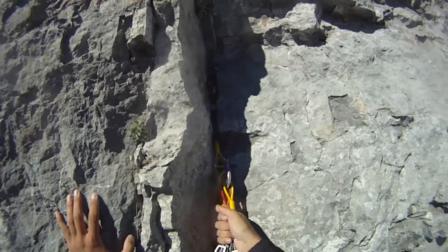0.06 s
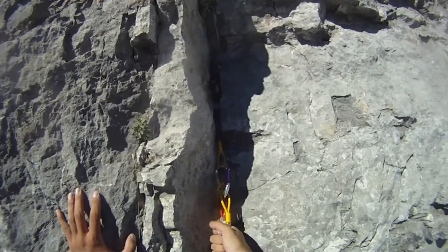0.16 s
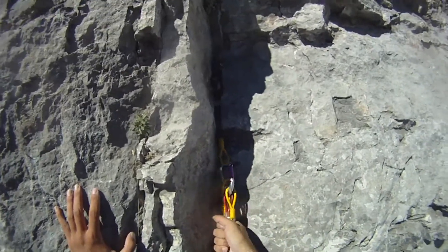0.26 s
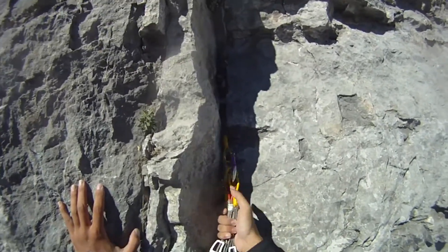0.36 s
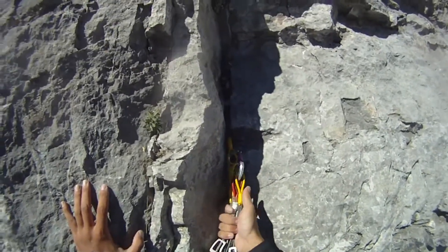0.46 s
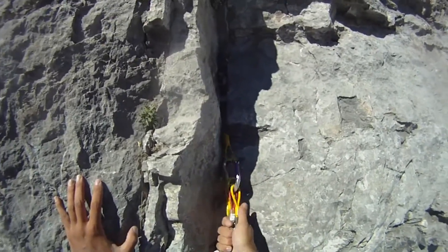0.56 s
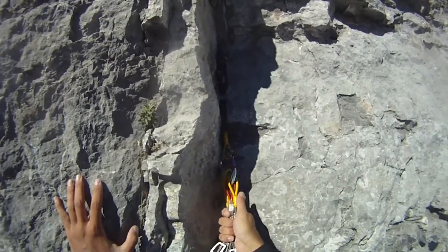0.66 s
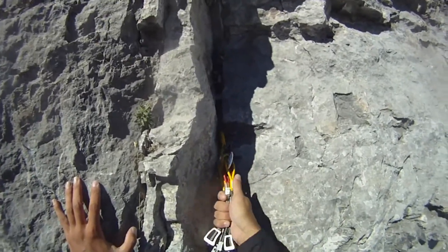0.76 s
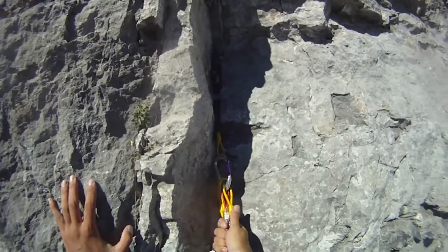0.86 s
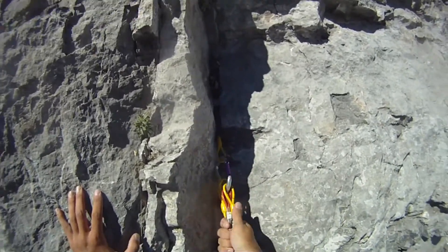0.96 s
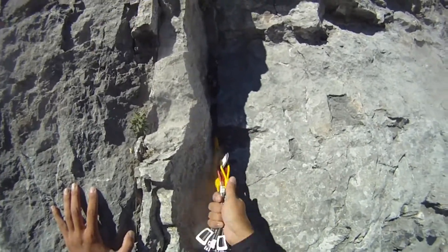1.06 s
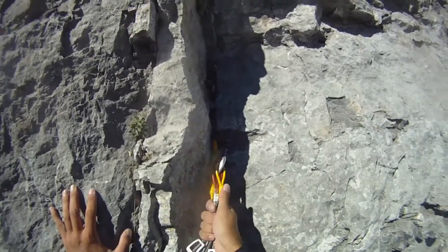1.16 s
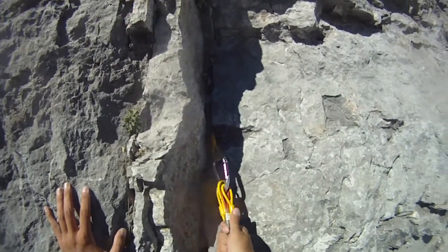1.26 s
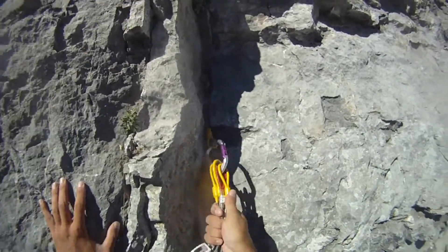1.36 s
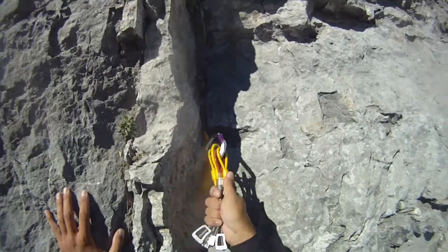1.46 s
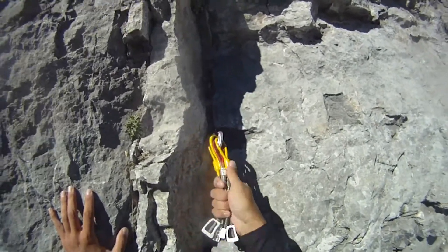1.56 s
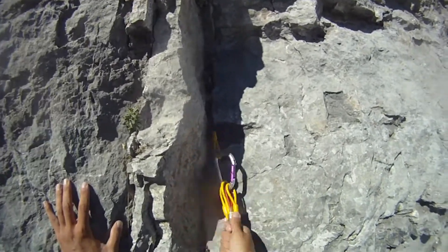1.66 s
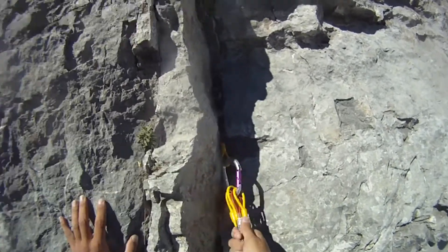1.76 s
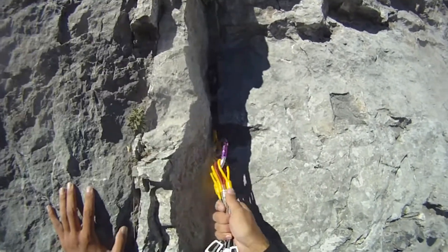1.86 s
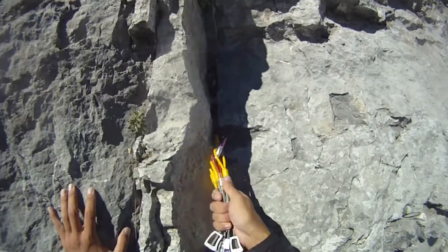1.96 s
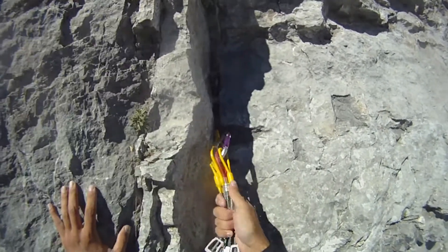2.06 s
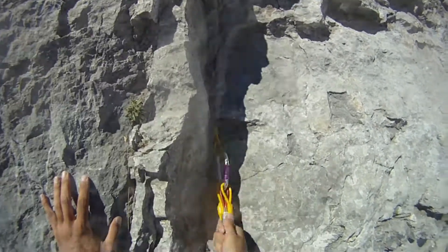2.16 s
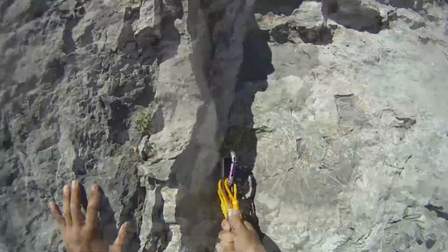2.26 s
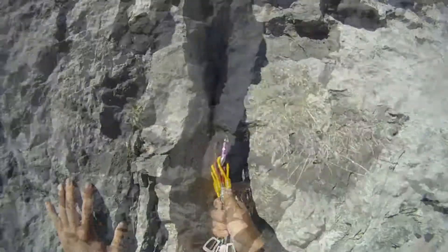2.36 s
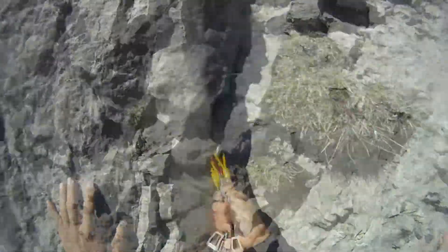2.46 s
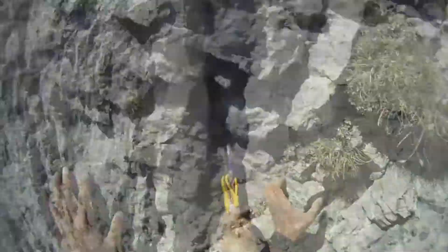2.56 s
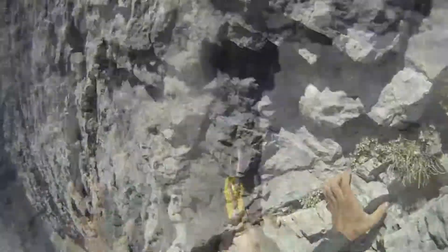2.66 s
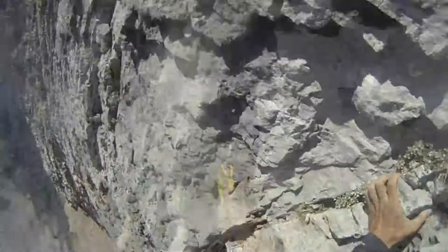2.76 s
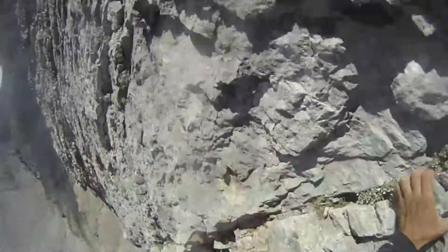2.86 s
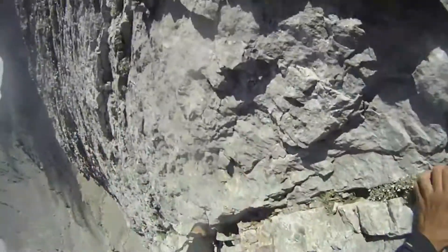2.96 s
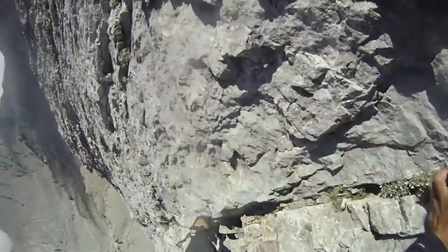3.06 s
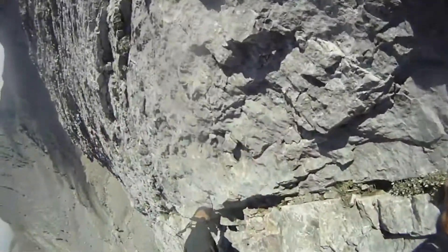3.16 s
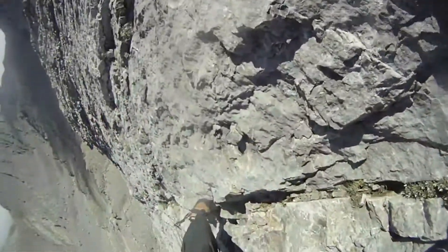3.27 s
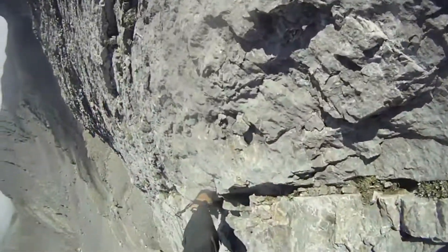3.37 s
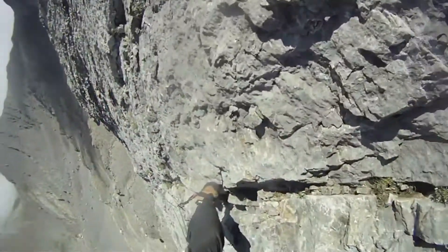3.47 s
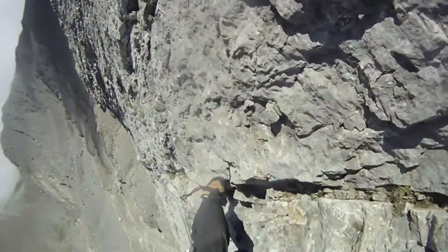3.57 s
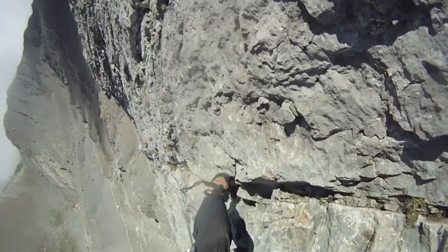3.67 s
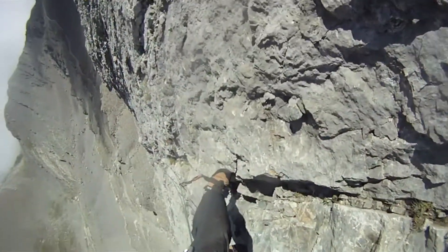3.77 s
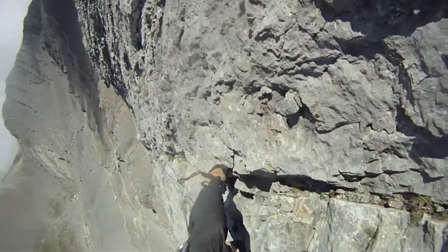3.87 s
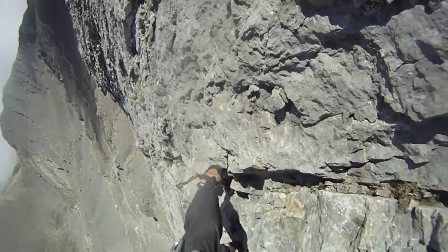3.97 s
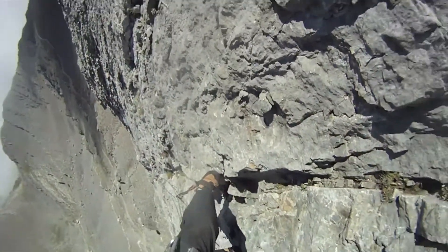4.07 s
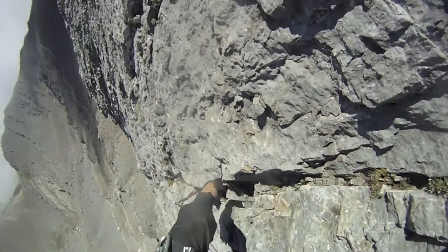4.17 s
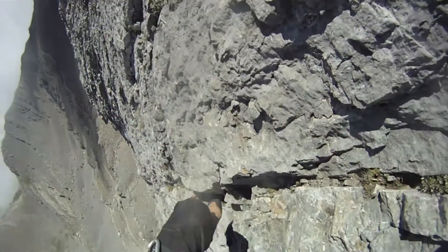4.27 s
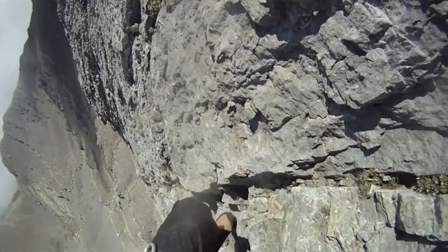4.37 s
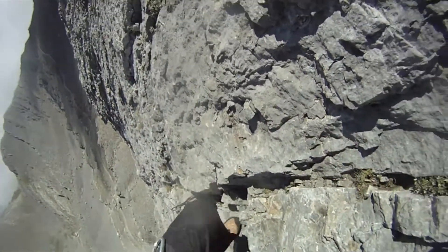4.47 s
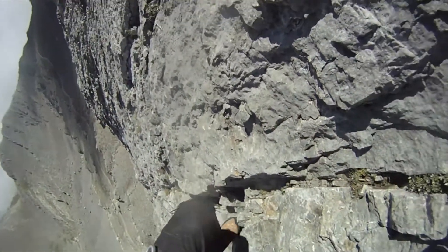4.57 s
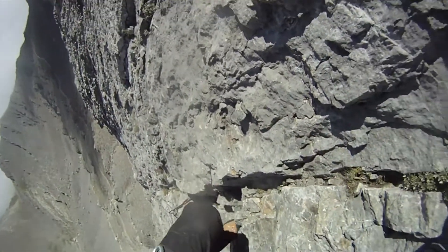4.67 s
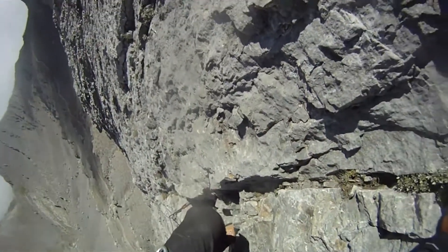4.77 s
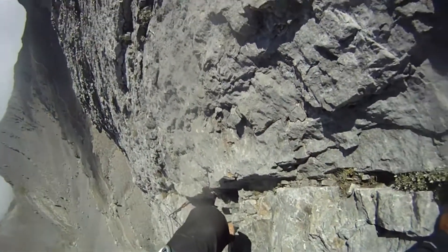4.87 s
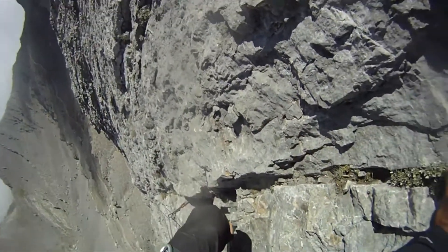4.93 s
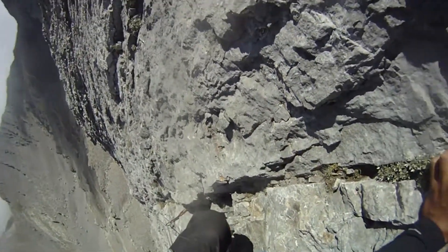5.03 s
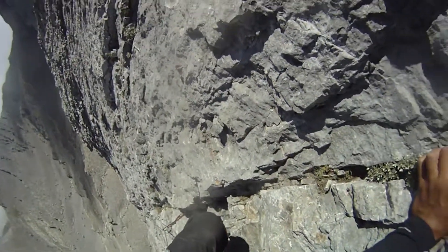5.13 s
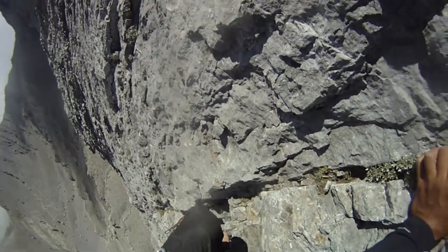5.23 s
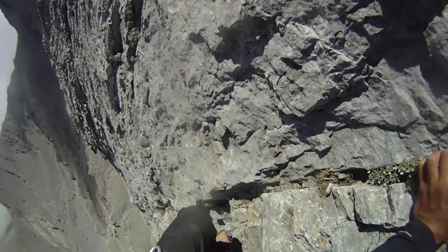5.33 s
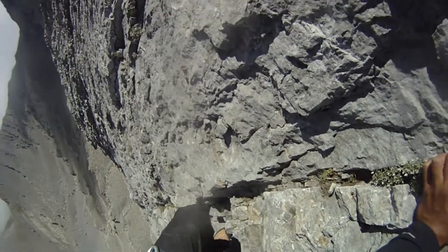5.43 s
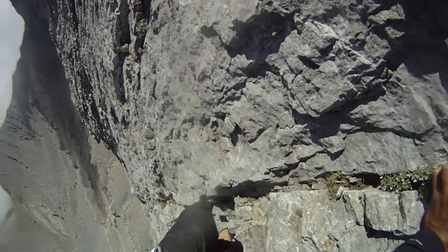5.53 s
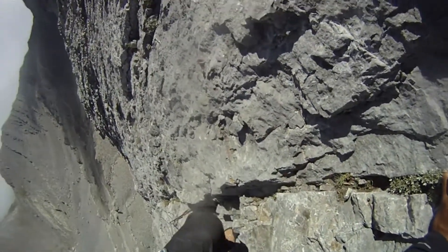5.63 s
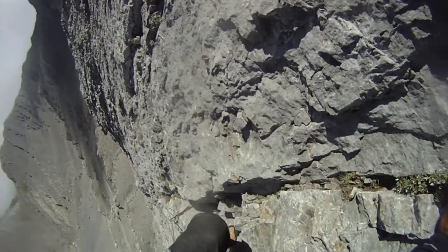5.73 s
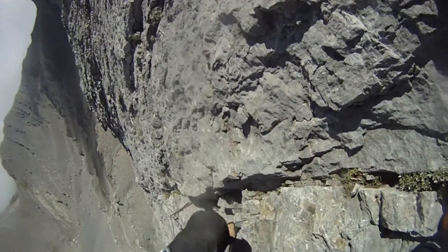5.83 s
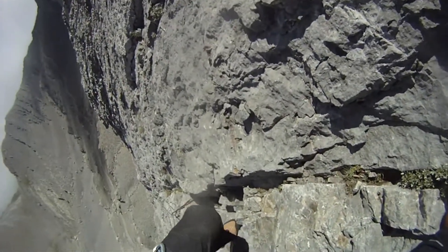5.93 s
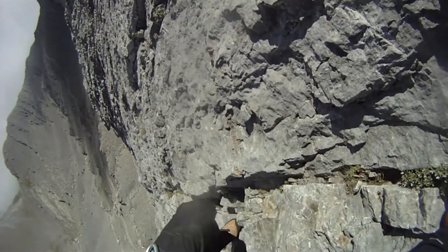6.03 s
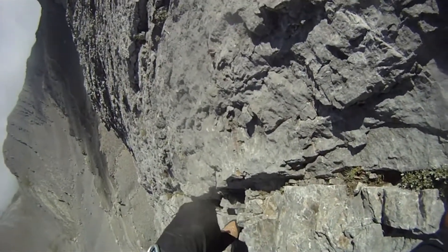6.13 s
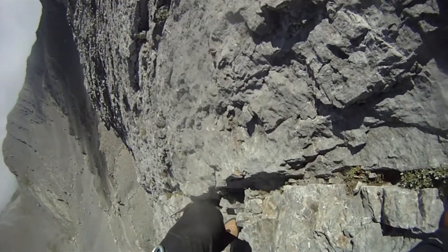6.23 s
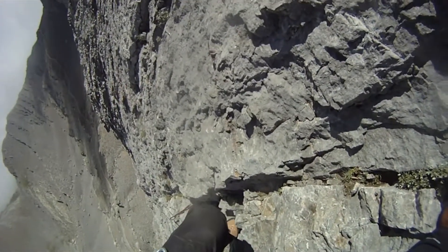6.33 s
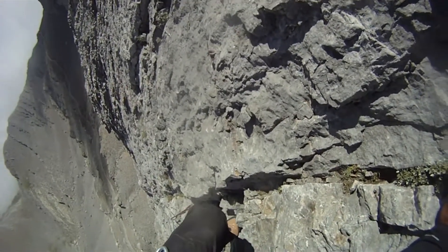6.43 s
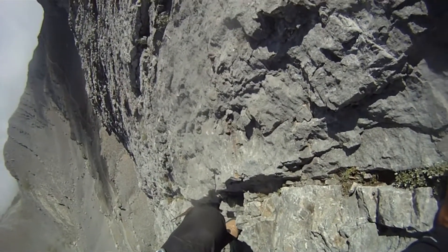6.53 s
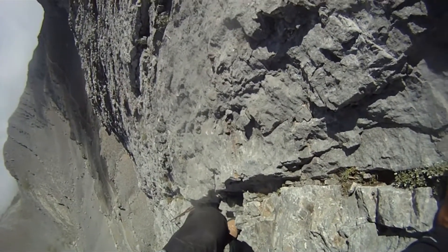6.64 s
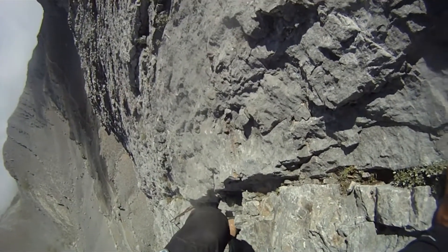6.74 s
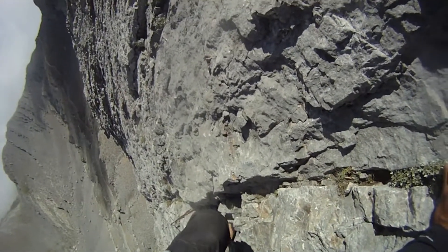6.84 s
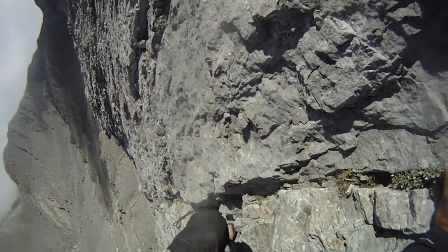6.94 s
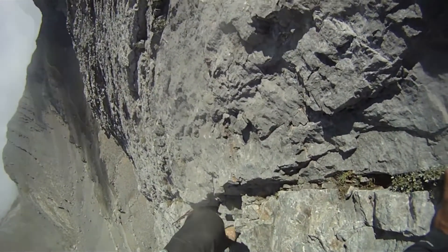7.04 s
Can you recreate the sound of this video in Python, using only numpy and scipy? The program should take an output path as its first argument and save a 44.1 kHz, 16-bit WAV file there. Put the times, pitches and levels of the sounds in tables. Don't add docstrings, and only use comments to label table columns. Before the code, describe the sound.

Metal climbing wedges are yanked in a rock crack, snapping and clinking over dull body thuds, then faint gear bumps and a carabiner chinks on a ledge.

```python
import sys
import numpy as np
from scipy import signal
from scipy.fft import rfft, irfft, next_fast_len
from scipy.io import wavfile
from scipy.ndimage import uniform_filter1d, minimum_filter1d

SR = 44100
rng = np.random.default_rng(int(sys.argv[2]) if len(sys.argv) > 2 else 0)


def invert_db(x):
    u = np.asarray(x, float) / 20
    return 10 ** u


def transcribe(u):
    v = np.clip(np.atleast_2d(u).T, -1, 1)
    q = np.round(v * 32767).astype(np.int16)
    wavfile.write(sys.argv[1], SR, q)


N = 313095

# pitch_hz, width_hz, level_db
KNOCK_MODES = [(1069, 99, 1), (1294, 170, 0)]
BODY_MODES = [(1635, 150, -4.5), (1980, 280, 4), (2430, 430, 3.5), (2647, 450, 1)]
EDGE_MODES = [(3104, 130, -4.5), (3490, 580, -3.5), (4050, 710, -2), (4490, 420, 0), (5210, 1850, -9)]
# start_s, end_s, level_db
SCRAPES = [(0.241, 0.401, -79), (0.606, .82, -78), (0.913, 1.038, -62), (1.281, 1.427, -68),
           (1.409, 1.522, -65.5), (1.715, 1.794, -64.5), (1.795, 1.963, -60.5), (2.231, 2.345, -66.5),
           (2.336, 2.43, -69), (2.614, 2.78, -90), (4.633, 4.81, -71.5)]
SLOW_HZ = 12000


def unit(x):
    return x / np.sqrt(np.mean(x ** 2))


def shape(x, gain):
    size = next_fast_len(N)
    hz = np.arange(size // 2 + 1) * SR / size
    return irfft(rfft(x, size) * gain(hz), size)[..., :N]


def coloured(points):
    hz, db = np.transpose(points)
    return unit(shape(rng.standard_normal(N), lambda f: invert_db(np.interp(np.log(f + 1), np.log(hz), db))))


def resonate(x, modes):
    out = 0
    for k, (hz, width_hz, db) in enumerate(modes):
        out = out + (-1) ** k * invert_db(db) * signal.lfilter(*signal.iirpeak(hz, hz / width_hz, SR), x)
    return out


def walk(rate_hz):
    hold = int(SR / rate_hz)
    return uniform_filter1d(np.repeat(rng.standard_normal(N // hold + 1), hold), hold)[:N]


def add(out, s, x):
    i = int(s * SR)
    out[i:i + len(x)] += x[:len(out) - i]


def effort():
    # start_s, end_s, level_db
    tugs = [(0., 0.04, -42), (0.59, 0.668, -42.5), (0.954, 1., -30), (1.302, 1.446, -24.5),
            (1.765, 1.935, -23.5), (2.246, 2.385, -30.5), (2.63, 2.75, -40.5), (3.155, 3.263, -51.5),
            (3.55, 4.1, -51), (4.2, 4.953, -52.5), (5.595, 5.646, -55), (6.15, 6.22, -52.5),
            (6.654, 6.724, -52), (6.9, 6.936, -50)]
    rise_db_per_s, fall_db_per_s = 300, 250
    t = np.arange(N) / SR
    pulls = [db - rise_db_per_s * np.maximum(start - t, 0) - fall_db_per_s * np.maximum(t - end, 0)
             for start, end, db in tugs]
    rest_db = -61 + 4 * walk(7)
    return np.maximum(np.max(pulls, axis=0), rest_db)


def rattles(tap_hz):
    rows, gap_s = [], 0.022
    for start, end, _ in SCRAPES[:-1]:
        gap, size, knock, edge, pitch = rng.standard_normal((10, 5)).T
        times = start - 0.025 + np.cumsum(gap_s * np.exp(0.5 * gap)) - gap_s
        for s, u, k, e, p in zip(times, size, knock, edge, pitch):
            if s < end - 0.015:
                rows.append((s, -64 + u, -3 + 3.36 * k, -15 + 7.5 * e, 0.0015, tap_hz * np.exp(0.11 * p)))
    return rows


def contacts(effort_db):
    # start_s, level_db, hollow_knock_rel_db, bright_edge_rel_db
    taps = [(0.2337, -58, -15, -16), (.248, -57, -8, 6), (.2573, -46, -19, 0), (0.2928, -46.5, -15, -1),
            (0.3272, -45, -7, 0), (0.3831, -48, -22, -2), (0.6045, -39.5, -27, 3), (0.661, -47.5, -23, -4),
            (0.667, -54, -19, -2), (0.735, -52, -17, -8), (0.815, -52, -15, 1), (.9257, -43, -24, -5),
            (0.9465, -36, -5.5, -1), (.9966, -47.5, -10, -5), (1.021, -54, -9, 1), (1.2796, -33.5, -6, 5.5),
            (1.2861, -39.5, -3, 0), (1.3474, -31, 1, -3.5), (1.3985, -51, -1, -12), (1.728, -43, -7, -4.5),
            (1.738, -45, -21, 0), (1.8054, -60, -1, -11), (1.8154, -35, -3.5, 9), (1.8318, -48.5, 1.5, -4),
            (1.878, -33, -7, 4.5), (2.0544, -50.5, -2, -6), (2.3164, -53, -1, -12), (2.3516, -41.5, -20, 5),
            (2.7595, -58, -16, 5)]
    # start_s, level_db, bright_edge_rel_db, wedge_pitch_hz
    clinks = [(0.647, -41, 0, 4050), (0.7484, -43.5, 0.5, 4100), (.81, -51, -14, 3030),
              (0.9597, -36.5, -4, 4070), (1.034, -45.5, 3, 3680), (1.0396, -38.5, 1.5, 3960),
              (1.2945, -35, 12, 4460), (1.324, -34.5, 4.5, 4200), (1.338, -33, 6, 3600),
              (2.2002, -50.5, 3, 3620), (2.261, -46, 10, 3700), (2.276, -54, -1, 3830),
              (2.2987, -47, 17, 3730), (2.621, -53, 2, 4050), (2.703, -54, 6, 3880),
              (2.7508, -49.5, 5, 3700), (2.754, -52, -4, 3650)]
    # start_s, level_db, bright_edge_rel_db, wedge_pitch_hz
    skids = [(0.3195, -38, 5.5, 2430), (0.377, -51, 5, 2530), (0.6164, -50, 11, 3700),
             (1.3418, -34, 11, 2390), (1.3765, -36, 3, 4100), (1.433, -51, -3, 2350),
             (1.4438, -34, 12, 2330), (1.4508, -38.5, 4.5, 2390), (1.8647, -51, -9, 3830),
             (2.208, -52, 7, 3980), (2.2926, -41, 5, 2600), (2.357, -40.5, 2, 2470), (2.5528, -43, 2, 2420),
             (2.6918, -44.5, 4, 3580)]
    # start_s, level_db, bright_edge_rel_db, piece_pitch_hz
    bumps = [(3.2314, -60.5, -13, 2130), (3.894, -51.5, 11, 3860), (3.9015, -54.5, 6, 3840),
             (4.127, -57, -9, 1870), (4.4481, -65, -1, 3770), (4.4776, -60, 6, 3800),
             (4.552, -52.5, -15, 1920), (4.5963, -53, 17, 4600), (4.6577, -54.5, 13, 3700),
             (4.68, -55, 12, 3770), (4.7273, -41, 19, 4700), (4.7563, -55, 8, 3770),
             (4.7717, -53.5, 6, 4550), (4.9468, -59.5, 6, 3670), (5.4476, -61, 3, 3790),
             (6.4481, -67, 5, 3290), (6.9274, -60, -20, 1980)]
    tap_hz = 2180

    def seated_db(s):
        return -8 + 0.42 * (effort_db[int(s * SR)] + 27)

    rows = [(s, db, knock, edge, 0.0012, tap_hz) for s, db, knock, edge in taps]
    rows += [(s, db, seated_db(s), edge, 0.0008, hz) for s, db, edge, hz in clinks]
    rows += [(s, db, seated_db(s), edge, 0.0034, hz) for s, db, edge, hz in skids]
    rows += [(s, db, -4.5 + 0.14 * edge, edge, 0.0013, hz) for s, db, edge, hz in bumps]
    return rows + rattles(tap_hz)


def ticks(hits, span=2000):
    out, t = np.zeros(N), np.arange(span) / SR
    for s, db, knock_db, edge_db, chatter_s, hit_hz in hits:
        fade = np.exp(-np.maximum(t - chatter_s, 0) / 0.0032)
        fade += 0.039 * np.exp(-t / 0.0028) + 0.4 * np.exp(-t / 0.00056)
        chatter = rng.standard_normal(span) * fade * np.minimum(t / 0.00029, 1)
        chatter[8] += 5.0
        parts = []
        for modes in (KNOCK_MODES, BODY_MODES, EDGE_MODES):
            varied = [(hz, width, g + 1.5 * rng.standard_normal()) for hz, width, g in modes]
            parts.append(unit(resonate(chatter, varied)))
        knock, body, edge = parts
        crack = unit(resonate(rng.standard_normal(span) * fade, [(3100, 2600, 0)]))
        bunch = body + invert_db(edge_db) * edge + invert_db(min(edge_db, 0) - 3.5) * crack
        wedge = unit(resonate(chatter, [(hit_hz, 320, 0)]))
        bright = bunch + invert_db(max(edge_db, 0) - 4.5) * wedge
        peak = uniform_filter1d(bright ** 2, size=70).max()
        add(out, s - 0.0003, invert_db(db + 0.95) * (invert_db(knock_db) * knock + bright) / np.sqrt(peak))
    return out


def grit():
    t, ease_s = np.arange(N) / SR, 0.012
    drag = 0
    for start, end, db in SCRAPES:
        drag = drag + invert_db(db) * np.clip(np.minimum(t - start, end - t) / ease_s + 0.5, 0, 1)
    grains = rng.standard_normal(N) * invert_db(3.0 * walk(150))
    modes = [*KNOCK_MODES, *BODY_MODES, *EDGE_MODES[:3], (2330, 5900, -10.0)]
    return drag * unit(resonate(grains, modes))


def chinks():
    # start_s, peak_db, t60_s, free_s until it is touched
    strikes = [
        (4.449, -67, 0.056, .02),
        (4.479, -62.5, 0.34, 0.078),
        (4.658, -55, 0.2, .062),
        (4.728, -52, 0.039, .02),
        (4.758, -53, 0.07, 0.034),
        (4.812, -60, 0.043, .015),
        (1.768, -59.5, 0.043, .02),
    ]
    # pitch_hz, level_db, t60_factor
    modes = [(3757, 7, 0.93), (3800, -10, 0.54), (4070, -11.5, 4.6), (3130, -28, 1.2), (4600, -7, .4)]
    out, t = np.zeros(N), np.arange(SR // 8) / SR
    for s, db, t60, free_s in strikes:
        ring = sum(invert_db(g) * np.sin(2 * np.pi * hz * t) * np.exp(-np.log(1000) * t / (t60 * factor))
                   for hz, g, factor in modes)
        add(out, s, invert_db(db) * ring * np.exp(-np.maximum(t - free_s, 0) / 0.003))
    return out


def thuds():
    # peak_s, level_db, pitch_hz
    heaves = [(0.261, -41, 58.4), (0.608, -45, 55.5), (0.95, -29.5, 47.4), (.999, -32.5, 39.8),
              (1.075, -45, 36.8), (1.136, -38.5, 35.7), (1.236, -44, 44.2), (1.299, -27, 52),
              (1.319, -29, 48), (1.343, -25, 43), (1.385, -35, 40), (1.43, -36.5, 38.8),
              (1.455, -30.5, 35.6), (1.551, -42, 34.6), (1.741, -28.5, 55), (1.775, -22.5, 39.6),
              (1.865, -28, 40.2), (1.905, -20, 39.8), (1.947, -34, 38), (2.0, -45, 32.5), (2.162, -40, 41),
              (2.217, -29.5, 47.6), (2.258, -27, 38), (2.345, -35, 37.7), (2.385, -28.5, 38.1),
              (2.62, -35.5, 54.3), (2.663, -39, 36), (4.455, -45, 42.3), (4.551, -45.5, 40)]
    # peak_s, level_db, pitch_hz
    nods = [(0.07, -50, 141), (.753, -39.5, 132), (0.977, -51, 112), (1.078, -38.5, 137), (1.297, -41, 107),
            (1.353, -33, 145), (1.403, -45, 136), (1.686, -46.5, 114.6), (1.752, -35.5, 97),
            (1.777, -47, 110), (1.815, -41, 125), (1.842, -38, 113.5), (1.867, -41, 109),
            (1.894, -32.5, 121), (2.06, -42, 142), (2.21, -50, 119), (2.274, -42, 105), (2.318, -51, 135),
            (2.368, -43, 124), (3.932, -47, 142), (3.956, -43, 158), (4.788, -46, 107)]
    out = np.zeros(N)
    for s, db, hz in [*heaves, *nods]:
        cycles = np.arange(int(5 * SR / hz)) * hz / SR
        envelope = np.minimum(cycles / 0.286, 1) * np.exp(-np.maximum(cycles - 0.5, 0) / 0.54)
        add(out, max(s - 0.3 / hz, 0), invert_db(db - 1.0) * np.sin(2 * np.pi * cycles) * envelope)
    return out


def jolts(effort_db):
    # pitch_hz, width_hz, level_db
    modes = [(21.7, 23.6, 1.9), (45.1, 20.15, 3.5), (85.7, 25, -11), (125, 36.3, -14.5), (209, 57, -32.5)]
    sway_db = -57.0 + 0.61 * (effort_db + 56.5) + 1.3 * walk(27)
    return invert_db(sway_db) * unit(resonate(rng.standard_normal(N), modes))


def hiss():
    # pitch_hz, density_db per Hz
    spectrum = [(60, -9), (110, -13), (290, -19), (430, -22), (840, -26.5), (1310, -29), (2500, -32.5),
                (4400, -34.5), (6000, -37.5)]
    return invert_db(-58.5 + 0.5 * walk(2.926)) * coloured(spectrum)


def scene():
    effort_db = effort()
    metal = ticks(contacts(effort_db)) + grit() + chinks()
    mono = metal + thuds() + jolts(effort_db) + hiss()
    return np.array([mono, mono])


def hold_samples(dry):
    fast_hz, top_hz = 48000, 15330
    t = np.arange(N) / SR
    base = shape(dry, lambda f: (f < SLOW_HZ / 2) / np.sqrt(1 + (f / 5450) ** 26))
    mirrored = base * (1 + 2 * np.cos(2 * np.pi * SLOW_HZ * t))
    return shape(mirrored, lambda f: np.sinc(f / SLOW_HZ) / np.sinc(f / fast_hz) / (1 + (f / top_hz) ** 160))


def thin_treble(x, split_hz=11300, near=1000):
    top = shape(x[0], lambda f: 1 / (1 + (split_hz / (f + 1)) ** 30))
    power = uniform_filter1d(top ** 2, size=128) + 1e-18
    click = -minimum_filter1d(-power, size=near, origin=-near // 4)
    keep = uniform_filter1d(1 / (1 + (click / power / invert_db(38)) ** 3), size=64)
    cells = signal.stft(top * keep, nperseg=2048)[2]
    usual = uniform_filter1d(np.abs(cells), size=60, axis=0)
    strong = cells * (np.abs(cells) > 1.05 * usual)
    sparse = signal.istft(strong, nperseg=2048)[1][:N]
    return x - top + 1.28 * sparse


def side_fuzz(held):
    # pitch_hz, density_db per Hz
    spectrum = [(59, -48), (100, -16), (357, -2), (2500, -2), (4540, -3), (5940, -8), (6670, -6.5),
                (8910, -9.5), (10000, -22), (13000, -29), (22000, -120)]
    busy = uniform_filter1d(shape(held[0], lambda f: f / (f + 500)) ** 2, size=1024)
    noise = shape(coloured(spectrum), lambda f: 1 - 1.1 * np.exp(-((f - SLOW_HZ / 2) / 330) ** 4))
    return invert_db(-78) * noise / (1 + busy / invert_db(-102)) * np.array([[1], [-1]])


def roll_off(x):
    return signal.sosfilt(signal.butter(12, 16520, fs=SR, output="sos"), x)


def record(dry):
    # silent_from_s, silent_to_s, fade_in_s
    gap = (3.0195, 3.041, 0.0049)
    start, end, fade = gap
    t = np.arange(N) / SR
    held = hold_samples(dry)
    gate = np.where(t < start, 1, np.clip((t - end) / fade, 0, 1))
    return roll_off(gate * (thin_treble(held) + side_fuzz(held)))


dry = scene()
out = record(dry)
transcribe(out)
```